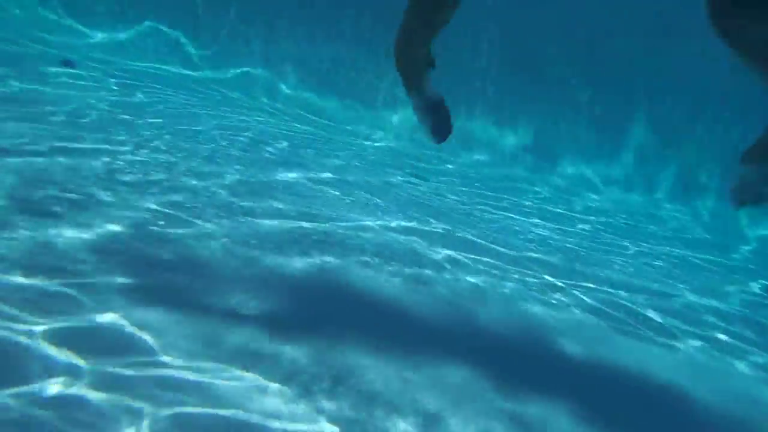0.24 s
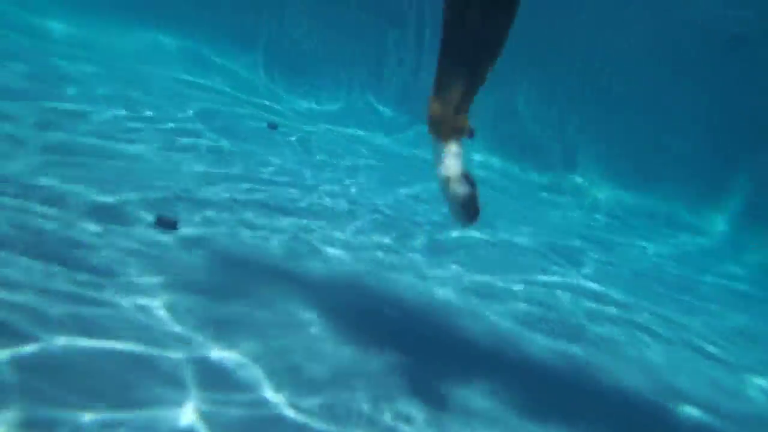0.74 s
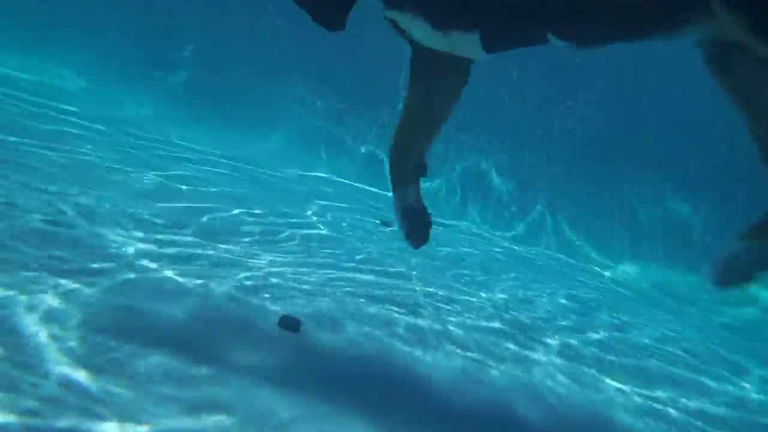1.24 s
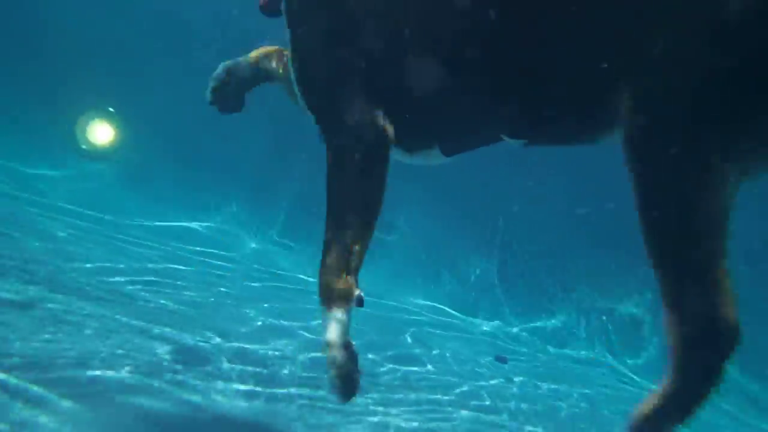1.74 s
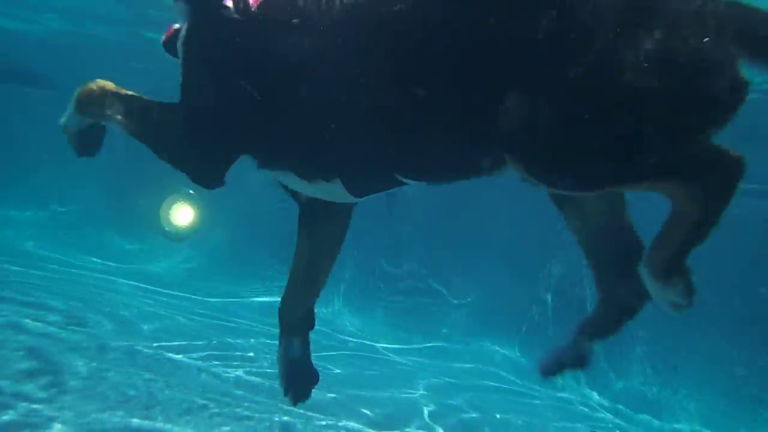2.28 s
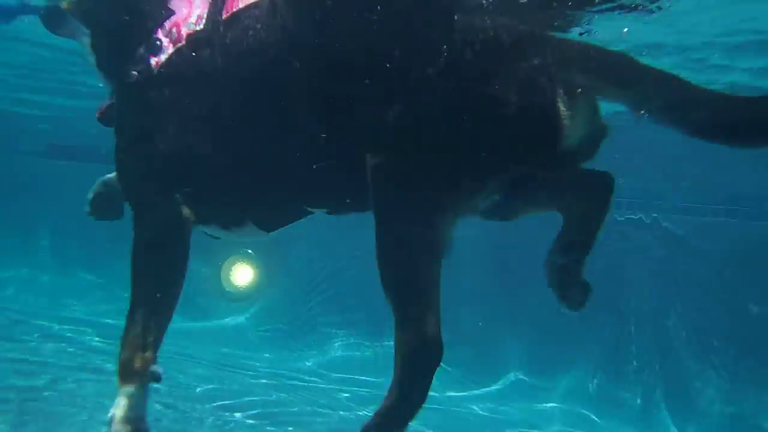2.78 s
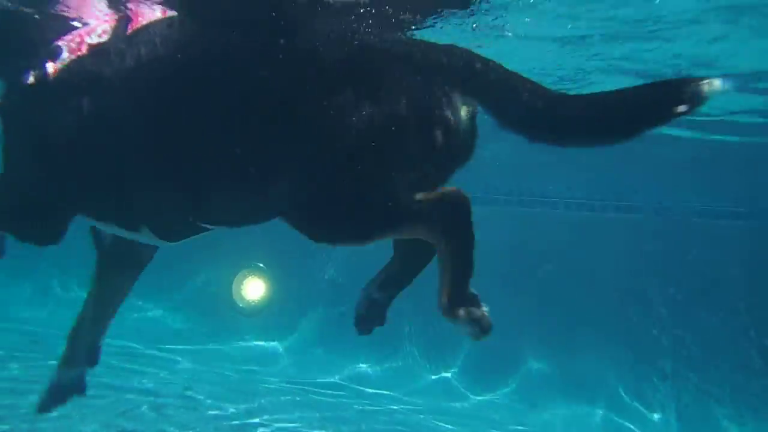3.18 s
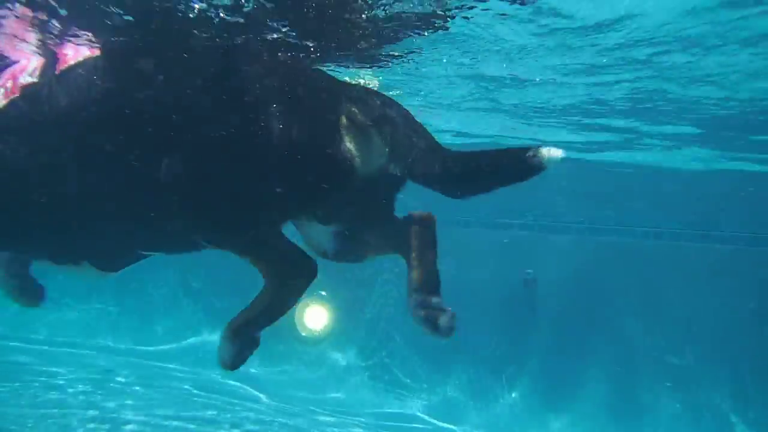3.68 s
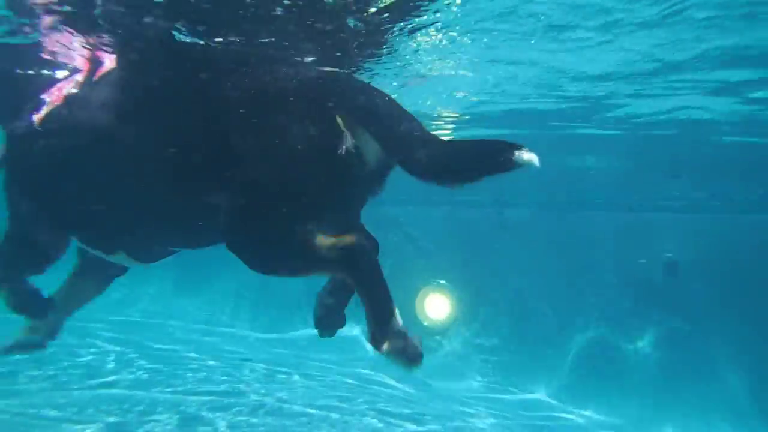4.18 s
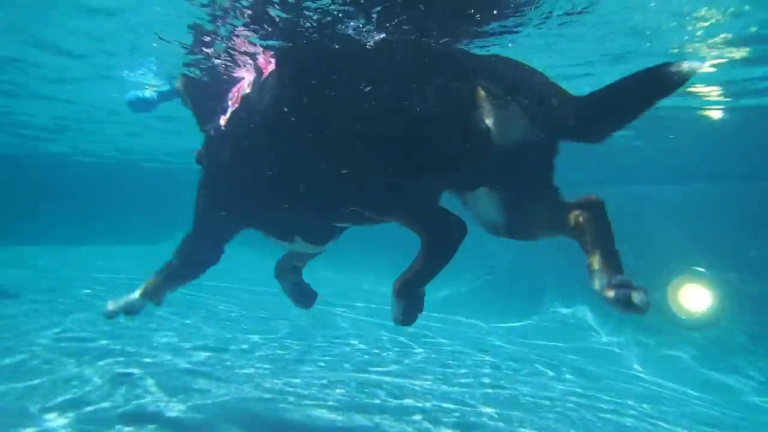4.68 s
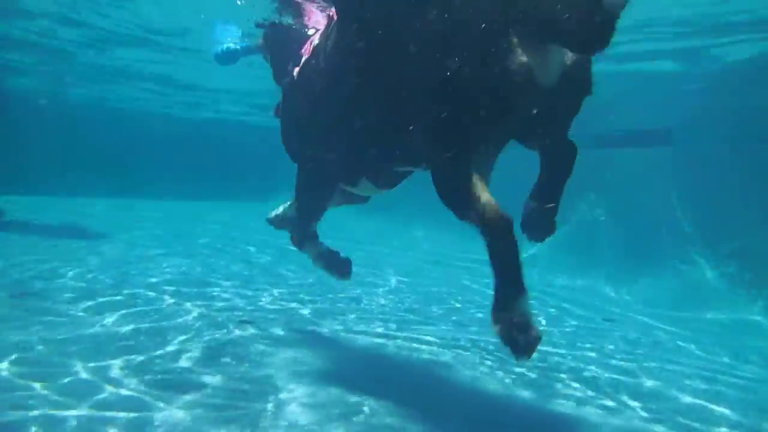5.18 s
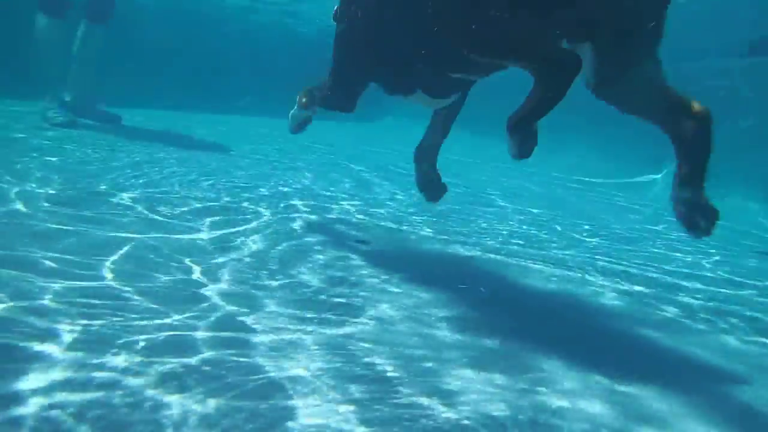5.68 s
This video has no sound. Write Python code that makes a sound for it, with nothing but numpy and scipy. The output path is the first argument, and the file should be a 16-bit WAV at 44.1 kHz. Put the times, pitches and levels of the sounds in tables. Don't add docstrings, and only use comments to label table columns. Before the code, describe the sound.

Close underwater sound from a camera in a sealed housing as a dog paddles past in a pool. Dense, hollow, boxy gurgling and quick watery thumps run continuously, with bubbles, small ticks and clipped peaks. At about four seconds the wake rocks the camera: low heaves, gulps and sharp slaps, mostly left. From five seconds it settles into softer paddling.

```python
import sys
import numpy as np
from scipy import signal
from scipy.fft import rfft, irfft, next_fast_len
from scipy.io import wavfile
from scipy.ndimage import uniform_filter1d, minimum_filter1d, map_coordinates

SR = 44100
rng = np.random.default_rng(int(sys.argv[2]) if len(sys.argv) > 2 else 0)


def how_loud(loudness_db):
    steps = np.asarray(loudness_db, float) / 20
    return 10 ** steps


def waveform_to_disk(signal):
    frames = np.transpose(np.atleast_2d(signal))
    scaled = np.clip(frames, -1, 1) * 32767
    samples = np.round(scaled).astype(np.int16)
    wavfile.write(sys.argv[1], SR, samples)


N = 261513

# t/s, churn level/dB, wall f/Hz, tip/(0-1)
PADDLE = [(0, -19, 585.7, 0.2), (.3, -22.5, 525, 0), (.7, -21.5, 530.4, 0), (.8, -25, 551, 0),
          (1.4, -21, 530, 0), (2.2, -22, 520, 0.07), (2.62, -20, 517.4, 0.01), (2.74, -17.5, 555.4, 0.6),
          (3.0, -20.5, 610.8, 0.7), (3.45, -20, 550.5, 0.1), (3.95, -19.5, 593, 0.2), (4.18, -21, 530.4, 0),
          (4.55, -33, 552.2, 0.1), (4.99, -26, 499.6, 0.8), (5.22, -21, 515, 0.4), (5.76, -24, 508, 0.4),
          (5.83, -19.5, 613, 0.5), (5.93, -26, 494.7, 0.4)]
# t/s, level/dB
GAIN = [(0, -40.5), (.48, -41), (.66, -45.5), (.89, -43.5), (1.17, -39), (1.57, -43.5), (2.3, -41),
        (2.6, -42), (2.95, -46.5), (3.34, -43), (3.65, -38), (4.13, -41), (4.17, -48), (4.3, -64.5),
        (4.55, -74), (4.99, -60), (5.3, -52.5), (5.93, -49.5)]
# t/s, share/(0-1)
ROCKED = [
    (3.98, 0),
    (4.06, 0.2),
    (4.17, 0.88),
    (4.88, 0.89),
    (5.0, 0.5),
    (5.15, 0.06),
]
# f/Hz, level/dB per Hz
SLOSH_SPECTRUM = [(88, -39), (150, -5.5), (237, 2), (275, -6), (307, -10), (377, -9.5), (420, -9),
                  (550, -18.5), (920, -120)]
# f/Hz, level/dB per Hz
RUMBLE_SPECTRUM = [(15, -57.5), (25, -27), (54, -16), (72, -8.5), (91, 3), (150, -6.5), (200, -37.5),
                   (330, -120)]
# f/Hz, width/Hz, level/dB
WALL_MODES = [(530, 138, 0), (660.5, 181, -14), (472, 90.5, -11.5)]
# f/Hz, width/Hz, level/dB
SHELL_MODES = [(1144, 120, 12), (1564, 121, 13), (1952, 134, 14), (2300, 42, -42), (2810, 330, -7),
               (3440, 710, -15)]
# t/s, peak level/dB, f/Hz
SURGES = [(0.127, -14.5, 518.5), (0.296, -19, 522), (0.358, -8.5, 542), (0.486, -10.5, 515),
          (0.547, -7.5, 512.6), (0.641, -13.5, 536.4), (0.677, -12.5, 532), (0.724, -14, 516),
          (0.803, -13.5, 584.6), (0.979, -11, 549), (1.073, -12, 550), (1.123, -11.5, 538.6),
          (1.204, -12, 474.5), (1.254, -14, 530), (1.366, -16.5, 441), (1.477, -14.5, 520),
          (1.59, -16, 472), (1.725, -10, 561), (1.795, -11.5, 550), (1.836, -14, 526), (1.912, -10, 591),
          (1.968, -9.5, 512), (2.01, -5.5, 521), (2.057, -16.5, 678), (2.124, -10, 525), (2.261, -9.5, 545),
          (2.302, -10, 593), (2.397, -11, 551.4), (2.473, -11, 503), (2.556, -14, 555), (2.612, -9.5, 518),
          (2.651, -12, 590), (2.801, -13.5, 628), (2.874, -12.5, 520), (2.919, -11.5, 506),
          (2.996, -13, 543), (3.056, -11.5, 580), (3.164, -8.5, 586), (3.297, -9, 604), (3.361, -9.5, 650),
          (3.439, -16, 489.6), (3.498, -11.5, 510), (3.553, -12, 609), (3.682, -10.5, 560),
          (3.732, -12, 617), (3.787, -14, 516.5), (3.85, -18.5, 602), (4.006, -16.5, 586)]
# t/s, peak level/dB, f/Hz
LATE_SURGES = [(0.244, -9, 536), (1.671, -9.5, 566.6), (3.931, -4.5, 619), (5.169, -12.5, 522),
               (5.219, -18, 531), (5.326, -13.5, 522), (5.438, -19.5, 515), (5.483, -17.5, 530),
               (5.564, -13, 501), (5.626, -14.5, 496), (5.789, -9.5, 514), (5.859, -10.5, 606),
               (5.893, -15.5, 503.6)]
# t/s, length/s, big level/dB, big f/Hz, small level/dB
FROTH = [(0.193, 0.03, -30.5, 869, -60.5), (0.603, 0.02, -31.5, 853, -63), (0.626, 0.009, -47.5, 1250, -59),
         (0.674, .045, -22.5, 760, -55.5), (0.794, 0.056, -29, 809, -63.5), (1.397, 0.026, -27, 783, -67),
         (1.586, 0.025, -23.5, 931, -43.5), (2.425, 0.027, -37, 885, -56), (2.744, 0.0069, -41, 1038, -58),
         (3.689, 0.048, -29.5, 844, -66), (5.854, 0.0088, -51.5, 1002, -72),
         (5.897, 0.035, -62.5, 1480, -57)]
# t/s, peak level/dB, f/Hz, length/cycles
TICKS = [(.619, -56, 5700, 51), (.625, -29, 3560, 17), (0.694, -28, 1260, 32), (1.606, -59, 5540, 22),
         (1.609, -55, 5350, 20), (2.7385, -30.5, 1300, 2.5), (5.054, -44.5, 3450, 9.3),
         (4.309, -52, 2760, 6.5), (2.803, -26, 53.3, 4.7), (3.226, -33, 50.6, 3.5),
         (4.951, -32.5, 43.85, 5.6), (5.346, -32, 45.7, 2.2), (2.431, -31, 1990, 18),
         (5.054, -39.5, 2300, 8.5), (5.079, -46, 3500, 10), (4.0, -23, 935, 12), (5.055, -36.5, 2980, 2.5),
         (5.081, -36, 3410, 1.7), (5.371, -21.5, 1754, 2.9), (5.500, -27, 1858, 5.4),
         (5.545, -28, 2000, 3.8), (5.708, -39.5, 2527, 5.2), (5.895, -57.5, 5460, 20)]
# t/s, peak level/dB
CRESTS = [(0.3588, -40), (0.5572, -40.5), (0.488, -39.5), (0.69, -37.5), (1.1253, -43), (1.2257, -37.5),
          (1.41, -43), (1.427, -43.5), (1.673, -43), (1.9134, -42), (2.0209, -39), (2.266, -40),
          (2.3899, -43), (2.4207, -41), (2.615, -41), (2.7244, -42.5), (2.7609, -43.5), (2.7781, -44),
          (2.8143, -46.5), (0.6099, -49), (.684, -48), (.246, -45), (1.837, -48), (3.75, -47.5),
          (3.95, -46), (3.985, -51.5), (2.8372, -47), (2.9415, -47.5), (3.005, -43), (3.1722, -45.5),
          (3.686, -42.5), (3.933, -38), (5.1884, -42), (5.3543, -60), (5.7912, -41)]
# t/s, hold/s, body level/dB, fizz level/dB, fizz top f/Hz
SPRAY = [
    (0.176, 0.018, -44.5, -68, 6010),
    (0.306, 0.013, -43, -79, 6000),
    (0.619, 0.025, -42.5, -71.5, 6000),
    (1.602, 0.022, -36, -75.5, 5600),
    (1.873, 0.006, -53.5, -59.5, 6410),
    (2.436, 0.01, -48.5, -73.5, 6070),
    (2.731, 0.00091, -49, -54, 8000),
    (2.7356, 0.00078, -45.5, -56.5, 8030),
    (2.737, 0.0024, -38, -54.5, 8500),
]
# f/Hz, width/Hz, level/dB
FOAM_MODES = [(1090, 170, 11), (1640, 130, 7.5), (2000, 200, 1.5), (2500, 190, 2.5), (3060, 180, 6),
              (3450, 160, 4.5)]
# f/Hz, level/dB per Hz
BUFFET_SPECTRUM = [(15, -60.5), (25, -23), (86, -5.5), (162, -9.5), (195, -8), (249, -9), (348, -16),
                   (400, -33), (520, -74), (880, -120)]
# t/s, hold/s, level/dB, left-right level/dB
HEAVES = [(4.03, .02, -26, -1), (4.09, 0.05, -16.5, 2), (4.145, .085, -15, 9), (4.245, 0.022, -23.5, -1.5),
          (4.285, 0.059, -19, 4), (4.35, 0.042, -24, 10), (4.39, 0.11, -21.5, 2),
          (4.48, 0.026, -17.5, 10.5), (4.58, 0.0068, -22.5, 9), (4.63, 0.079, -26.5, 8),
          (4.71, 0.17, -36.5, 10), (4.815, 0.063, -28.5, 14), (4.94, 0.046, -30.5, 9),
          (5.03, 0.38, -27, -1)]
# t/s, hold/s, level/dB, left-right level/dB
GULPS = [(4.06, 0.075, -32, -4), (4.13, 0.0096, -21.5, 4), (4.165, 0.014, -24, 2.5),
         (4.205, 0.0067, -27.5, 24.5), (4.25, 0.012, -25, 14), (4.355, 0.0055, -35, 17),
         (4.4, 0.03, -26.5, 19), (4.472, 0.037, -21.5, 12.5), (4.575, 0.048, -33.5, 10),
         (4.638, 0.013, -22.5, 16.5), (4.675, 0.014, -23, 18), (4.728, 0.012, -27, 22.5),
         (4.82, 0.054, -29, 14.5), (4.92, 0.13, -26.5, -2.5), (5.03, 0.053, -23, 0.5)]
# f/Hz, width/Hz, level/dB
POCKET_MODES = [(340, 90, 4.5), (570, 220, 1.5), (681, 168, -1)]
# t/s, snap level/dB, ring level/dB, ring f/Hz, edge level/dB
KNOCKS = [(4.1171, -30, -29.5, 577, -18.5), (4.179, -44.5, -36.5, 650, -29.5),
          (4.2108, -33, -21.5, 718, -37.5), (4.2251, -31, -27, 571, -24.5), (4.2495, -34, -22, 570, -24.5),
          (4.2554, -23.5, -27.5, 534, -34.5), (4.3269, -32.5, -20, 509, -30.5),
          (4.3307, -36, -25.5, 673, -36.5), (4.3566, -33.5, -19, 708, -32.5),
          (4.4039, -47.5, -17.5, 762, -23.5), (4.4211, -26.5, -18, 691, -32.5),
          (4.4428, -33.5, -32.5, 658, -26), (4.4895, -32.5, -17.5, 612, -23.5),
          (4.6474, -48.5, -19.5, 636, -20), (4.6518, -36.5, -23, 675, -28.5),
          (4.6864, -34, -21, 706, -23.5), (4.1445, -45.5, -39, 600, -22), (4.3077, -45.5, -39, 600, -22.5),
          (4.4503, -50.5, -40.5, 597, -25.5), (4.7347, -51, -19.5, 487, -31.5),
          (4.201, -38, -35.5, 598, -29), (4.219, -36.5, -30.5, 603, -25), (4.324, -36.5, -26.5, 601, -31.5),
          (4.472, -46.5, -33.5, 661, -20.5), (4.6925, -45, -32.5, 650, -20)]
# t/s, ring f/Hz, drive level over the stops/dB, 20 dB fall time/s, spit level/dB
SLAMS = [
    (4.4558, 745, 7, .012, -20),
    (4.4853, 700, 1.5, .008, -26),
    (4.7001, 560, 2.5, .009, -24),
]
# t/s, f/Hz, level/dB
COLUMN = [
    (4.09, 186.6, -42.5),
    (4.115, 190.4, -15.5),
    (4.135, 175.2, -23.5),
    (4.156, 164, -13.5),
    (4.228, 156.3, -8),
    (4.243, 138.4, -35.5),
    (4.285, 123, -22),
    (4.328, 115.5, -6.5),
    (4.35, 111.6, -39.5),
]
# f/Hz, level/dB per Hz
HISS_SPECTRUM = [(2500, -42.5), (3700, -8.5), (4500, 5), (6000, 6.5), (8000, 4.5), (11000, -1.5),
                 (15800, -9)]
# f/Hz, share/(-1 to 1)
OPPOSED = [(4300, 0.5), (5600, 0.54), (7000, 0.62), (9000, 0.48), (12000, -0.73)]
# f/Hz, phase/rad
LEAD = [(340, 0), (470, -.13), (570, -.58), (690, -.24), (800, 0), (1290, -.3), (1590, -.63), (1900, -1.17),
        (2500, -1.36), (3000, -.74), (3450, -.48)]
# f/Hz, level/dB
TILT = [(250, 0), (430, 1.5), (550, 4), (650, -2.7), (780, -3.9), (900, -.8), (1400, 0), (1900, -2.4),
        (2500, -6.3), (3000, -13), (3450, -11), (4500, 0)]
# f/Hz, likeness/(0-1)
ALIKE = [(430, .995), (520, .94), (620, .62), (780, .85), (900, .95), (1600, .99), (2500, .93), (3500, .94)]

SLOSH_DB, SLOSH_FOLLOWS, SLOSH_TIP_DB = -25.5, 0.57, 7.5
RUMBLE_DB, RUMBLE_FOLLOWS, RUMBLE_TIP_DB = -31, 0.3, -7
CHURN_MEAN_DB = -20
SWING_DB, SWING_RATE, FLUTTER_HZ, FLUTTER_RATE = 1.0, 16, 10, 9
SHOULDER_DB, SHOULDER_TIP_DB, SHOULDER_AFTER_DB = -1, -9, -3.5
STILL_DB, STILL_BEFORE_S, STILL_AFTER_S = -9, .018, .009
BIG_COUNT, SMALL_COUNT, SMALL_HZ = 20, 45, 2980
BUBBLE_RISE = .025
FOAM_TOP_HZ = 3730
HEAVE_RISE_S, HEAVE_FALL_S, HEAVE_REST_DB = 0.042, 0.012, -36
GULP_RISE_S, GULP_FALL_S, GULP_REST_DB = 0.013, 0.0056, -50
FIZZ_DB = -44.5
ROCKING_HZ, ROCKING_WIDTH_HZ, ROCKING_DB = [[148.1], [105]], 83, 0
SPIT_S = .005
SLAM_UP, SLAM_DOWN, SLAM_MASK_S = .42, .27, 0.0064
HISS_DB, HISS_FOLLOWS, GAIN_MEAN_DB = -66, 0.73, -41.5
TOP = .422


def unit(x):
    return x / np.sqrt(np.mean(x ** 2, axis=-1, keepdims=True) + 1e-20)


def along(points, hz):
    f, v = np.transpose(points)
    return np.interp(np.log(hz + 1), np.log(f + 1), v)


def curves(rows):
    s, *cols = np.transpose(rows)
    return [np.interp(np.arange(N) / SR, s, c) for c in cols]


def wobble(rate):
    knots = rng.standard_normal(int(N * rate / SR) + 4)
    return map_coordinates(knots, [np.arange(N) * rate / SR])


def filtered(x, response):
    lap = SR // 4
    m = next_fast_len(N + 2 * lap)
    wide = np.pad(x, [(0, 0)] * (x.ndim - 1) + [(lap, lap)], mode="wrap")
    return irfft(rfft(wide, m) * response(np.fft.rfftfreq(m, 1 / SR)), m)[..., lap:lap + N]


def modes(table):
    def response(f):
        total = 0
        for k, (c, w, db) in enumerate(table):
            damping = 1j * f * w
            total = total + (-1) ** k * how_loud(db) * damping / (c * c - f * f + damping)
        return total
    return response


def below(edge_hz, steep):
    return lambda f: 1 / np.sqrt(1 + (f / edge_hz) ** steep)


def eddies(lump_db, rate):
    return rng.standard_normal((2, N)) * how_loud(lump_db * np.array([wobble(rate), wobble(rate)]))


def sliding(hz, width_hz):
    pole = np.exp(-np.pi * width_hz / SR)
    push = eddies(0.51, 24) + 1j * rng.standard_normal((2, N))
    swing = signal.lfilter([1], [1, -2 * pole, pole ** 2], push)
    carrier = np.exp(2j * np.pi * np.cumsum(hz, axis=-1) / SR)
    return unit((swing * carrier).real)


def add(track, s, piece):
    part = track[max(round(s * SR), 0):][:len(piece)]
    part += piece[:len(part)]


def bursts(rows, rise_s, fall_s, rest_db):
    t, power = np.arange(SR // 3) / SR, np.full((N, 2), how_loud(2 * rest_db))
    for s, hold_s, db, pan_db in rows:
        decay = np.exp(-np.clip(t - rise_s - hold_s, 0, None) / fall_s)
        shape = np.clip(t / rise_s, 0, 1) * decay
        peak = how_loud(db + np.array([.5, -.5]) * pan_db)
        add(power, s - rise_s, (peak * shape[:, None]) ** 2)
    return np.sqrt(power.T)


def churn():
    churn_db, wall_hz, tip = curves(PADDLE)
    shell_db, = curves(GAIN)
    drum_db = churn_db + SWING_DB * wobble(SWING_RATE)
    drum_hz = wall_hz + FLUTTER_HZ * wobble(FLUTTER_RATE)
    swell_db = churn_db - CHURN_MEAN_DB
    slosh_db = SLOSH_DB + SLOSH_FOLLOWS * swell_db + SLOSH_TIP_DB * tip
    rumble_db = RUMBLE_DB + RUMBLE_FOLLOWS * swell_db + RUMBLE_TIP_DB * tip
    calm = np.sqrt(np.clip(1 - curves(ROCKED)[0], 0, 1))

    flow = eddies(0.77, 14)
    deep = unit(filtered(flow, lambda f: how_loud(along(SLOSH_SPECTRUM, f))))
    shallow = unit(filtered(flow, lambda f: how_loud(along(SLOSH_SPECTRUM, f / 1.27))))
    lift = np.clip(tip, 0, 1)
    slosh = (1 - lift) * deep + lift * shallow
    rumble = unit(filtered(eddies(0.27, 20), lambda f: how_loud(along(RUMBLE_SPECTRUM, f))))

    once_rocked = np.arange(N) > ROCKED[2][0] * SR
    shoulder_db = SHOULDER_DB + SHOULDER_TIP_DB * tip + SHOULDER_AFTER_DB * once_rocked + 2.3 * wobble(9)
    shoulders = how_loud(shoulder_db) * unit(filtered(eddies(1.0, 25), modes(WALL_MODES[1:])))
    wall = sliding(drum_hz, WALL_MODES[0][1]) + shoulders
    drum = unit(filtered(wall, lambda f: below(860, 9)(f) * (1 - below(330, 4)(f))))

    shell_band = lambda f: modes(SHELL_MODES)(f) * below(3700, 30)(f) * (1 - below(800, 4)(f))
    shell = unit(filtered(eddies(1.1, 60), shell_band))
    low = how_loud(rumble_db) * rumble + how_loud(slosh_db) * slosh
    return calm * (low + how_loud(drum_db + 1.0) * stilled() * drum) + how_loud(shell_db + 2.0) * shell


def stilled():
    depth, t = np.zeros(N), np.arange(SR // 10) / SR
    onset = np.minimum(2 * t / STILL_BEFORE_S, 1)
    release = np.exp(-np.clip(t - STILL_BEFORE_S, 0, None) / STILL_AFTER_S)
    for s, *_ in SURGES + LATE_SURGES:
        add(depth, s - STILL_BEFORE_S, onset * release)
    return how_loud(STILL_DB * np.minimum(depth, 1))


def surges():
    out, t = np.zeros(N), np.arange(SR // 12) / SR
    for s, db, hz in SURGES + LATE_SURGES:
        envelope = how_loud(db + 1.5 - 60 * t / .085) * (1 - np.exp(-t / .0004))
        add(out, s - .0015, envelope * np.sin(2 * np.pi * hz * t))
    return out


def bubbles(out, s, length, db, hz, spread, cycles, many):
    t = np.arange(SR // 40) / SR
    pitch, size = rng.standard_normal((2, many, 1))
    rank = np.argsort(pitch, axis=0)
    f = hz * np.exp(spread * np.linspace(-1.7, 1.7, many)[rank])
    life = t * f / cycles
    envelope = how_loud(db + 4.5 * size - 13.1 * life) * (1 - np.exp(-10.5 * life))
    grains = envelope * np.sin(2 * np.pi * f * t * (1 + BUBBLE_RISE * life))
    for lag, grain in zip(rng.random(many), grains):
        add(out, s + length * lag, grain)


def froth():
    big, small = np.zeros(N), np.zeros(N)
    for s, length, big_db, big_hz, small_db in FROTH:
        bubbles(big, s, length, big_db, big_hz, .13, 10, BIG_COUNT)
        bubbles(small, s, length, small_db, SMALL_HZ, .2, 3.5, SMALL_COUNT)
    return big + how_loud(15.5) * filtered(small, lambda f: modes(SHELL_MODES)(f) * below(3800, 16)(f))


def ticks():
    out, t = np.zeros(N), np.arange(SR // 6) / SR
    for s, db, hz, cycles in TICKS:
        life = 3 * t * hz / cycles
        swell = (life * np.exp(1 - life)) ** 2
        add(out, s, how_loud(db) * swell * np.sin(2 * np.pi * hz * t))
    return out


def crests():
    corner = np.zeros(N)
    for s, db in CRESTS:
        corner[round(s * SR) + 25] = how_loud(db + 21.0)
    return filtered(corner, lambda f: modes([(1500, 2500, 0)])(f) * below(7500, 2.5)(f))


def spray():
    out, t = np.zeros(N), np.arange(SR // 16) / SR
    f = np.fft.rfftfreq(len(t), 1 / SR)
    for s, hold_s, body_db, fizz_db, fizz_hz in SPRAY:
        shape = np.clip(t / .0015, 0, 1) * np.exp(-np.clip(t - hold_s, 0, None) / 0.0016)
        a, b, lumps = rng.standard_normal((3, len(t)))
        body_band = below(FOAM_TOP_HZ, 24)(f) * modes(FOAM_MODES)(f)
        fizz_band = below(fizz_hz, 14)(f) * (1 - below(4600, 8)(f))
        body = unit(irfft(rfft(a) * body_band, len(t)))
        fizz = unit(irfft(rfft(b) * fizz_band, len(t)))
        crackle = how_loud(3.3 * unit(uniform_filter1d(lumps, size=60)))
        add(out, s, shape * crackle * (how_loud(body_db) * body + how_loud(fizz_db) * fizz))
    return out


def wake():
    heave = unit(filtered(eddies(0.39, 21), lambda f: how_loud(along(BUFFET_SPECTRUM, f))))
    rocking = sliding(np.ones(N) * ROCKING_HZ, ROCKING_WIDTH_HZ)
    heave = unit(heave + how_loud(ROCKING_DB) * rocking)
    gulp_band = lambda f: modes(POCKET_MODES)(f) * below(920, 18)(f) * (1 - below(330, 4)(f))
    fizz_band = lambda f: below(1500, 3)(f) * below(4300, 20)(f) * (1 - below(900, 6)(f))
    gulp = unit(filtered(eddies(0.29, 27), gulp_band))
    gulp = gulp + how_loud(FIZZ_DB) * unit(filtered(eddies(2.0, 210), fizz_band))
    both = (bursts(HEAVES, HEAVE_RISE_S, HEAVE_FALL_S, HEAVE_REST_DB) * heave
            + bursts(GULPS, GULP_RISE_S, GULP_FALL_S, GULP_REST_DB) * gulp)
    return np.sqrt(np.clip(curves(ROCKED)[0], 0, 1)) * both


def knocks():
    near, far, spit = np.zeros((3, N))
    t = np.arange(SR // 20) / SR
    for s, snap_db, ring_db, hz, edge_db in KNOCKS:
        s += .002
        wave = np.cos(2 * np.pi * hz * t - .6)
        ring = how_loud(ring_db + 13.5 - 60 * t / 0.022) * wave * (1 - np.exp(-t / 0.00092))
        snap_s = 0.0077 * how_loud(ring_db + 23)
        squared = 0.24 + np.tanh(3 * wave)
        snap = how_loud(snap_db + 7.5 - 60 * t / snap_s) * squared * (1 - np.exp(-t / .00008))
        add(near, s, ring + snap)
        add(far, s + 0.0011, how_loud(-19) * ring + how_loud(-27.0) * snap)
        add(spit, s, how_loud(snap_db + edge_db + 21.0 - 60 * t / SPIT_S) * rng.standard_normal(len(t)))
    spit = filtered(spit, below(6500, 4.0))
    return np.array([near + spit, far - how_loud(-14.5) * spit])


def slams():
    swing, mask, t = np.zeros(N), np.zeros(N), np.arange(SR // 20) / SR
    for s, hz, drive_db, fall_s, spit_db in SLAMS:
        envelope = SLAM_UP * how_loud(drive_db - 20 * t / fall_s) * (1 - np.exp(-t / .00007))
        free = envelope * np.cos(2 * np.pi * hz * t - 1.1)
        add(swing, s, np.clip(free, -SLAM_DOWN, SLAM_UP) * np.exp(-(t / 0.018) ** 2))
        spit = uniform_filter1d(rng.standard_normal(len(t)), size=3)
        add(swing, s, how_loud(spit_db - 60 * t / 0.013) * spit)
        add(mask, s, 1.5 * np.exp(-(t / SLAM_MASK_S) ** 2))
    return swing, 1 - np.clip(uniform_filter1d(mask, size=20), 0, 1)


def column():
    hz, db = curves(COLUMN)
    t = np.arange(N) / SR
    present = (t > COLUMN[0][0]) * (t < COLUMN[-1][0])
    swing = how_loud(db) * np.sin(2 * np.pi * np.cumsum(hz) / SR) * present
    return swing * how_loud([[0], [-14]])


def hiss():
    left, other = unit(filtered(eddies(0.88, 10.0), lambda f: how_loud(along(HISS_SPECTRUM, f))))
    share = lambda f: np.clip(along(OPPOSED, f), -1, 1)
    right = filtered(other, lambda f: np.sqrt(1 - share(f) ** 2)) - filtered(left, share)
    hiss_db = HISS_DB + HISS_FOLLOWS * (curves(GAIN)[0] - GAIN_MEAN_DB) + 4.5
    return how_loud(hiss_db) * np.array([left, right])


def ports(pair):
    turn = lambda f: np.arccos(np.clip(along(ALIKE, f), -1, 1)) / 2
    mid, side = filtered(pair, lambda f: np.array([np.cos(turn(f)), np.sin(turn(f))]))
    skew = lambda f: how_loud(along(TILT, f) / 2) * np.exp(.5j * along(LEAD, f))
    wall = lambda f: 1 + 0.39 * below(1100, 8)(f)
    both = np.array([mid + side, mid - side])
    before = filtered(both, lambda f: np.array([skew(f), 1 / skew(f)]))
    after = filtered(both, lambda f: np.array([skew(f) ** wall(f), skew(f) ** -wall(f)]))
    settled = np.interp(np.arange(N) / SR, [4.3, 4.7], [0, 1])
    return (1 - settled) * before + settled * after


def scene():
    water = churn()
    water[0] += surges() + froth() + ticks() + crests() + spray()
    left, right = ports(water) + wake() + knocks() + hiss() + column()
    swing, kept = slams()
    leak = how_loud(-21.5) * filtered(swing, lambda f: 1 - below(1800, 4)(f))
    return np.array([kept * left + swing, right - leak])


def band_limit(x):
    return signal.sosfilt(signal.butter(12, 15830, fs=SR, output="sos"), x)


def record(dry):
    need = np.minimum(1, TOP / (np.abs(dry) + 1e-9))
    gain = uniform_filter1d(minimum_filter1d(need, size=500, axis=1), size=300, axis=1)
    eased = dry * np.roll(gain, 250, axis=1)
    clipped = eased / (1 + np.abs(eased / TOP) ** 14) ** (1 / 14)
    return band_limit(clipped)


dry = scene()
out = record(dry)
waveform_to_disk(out)
```